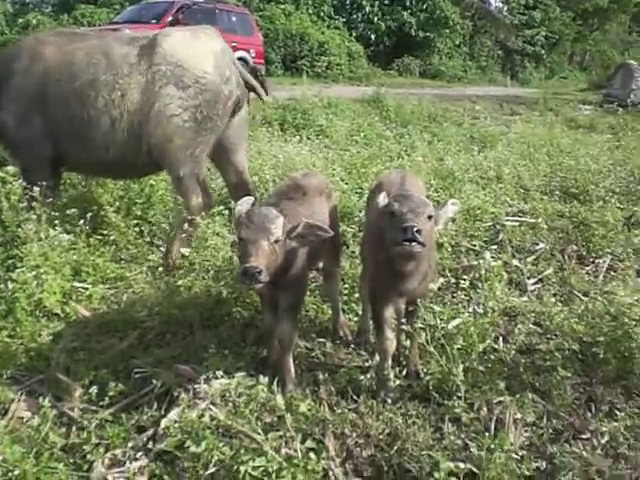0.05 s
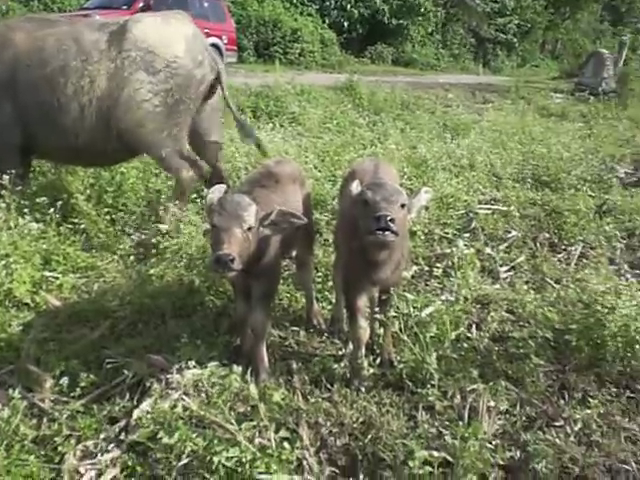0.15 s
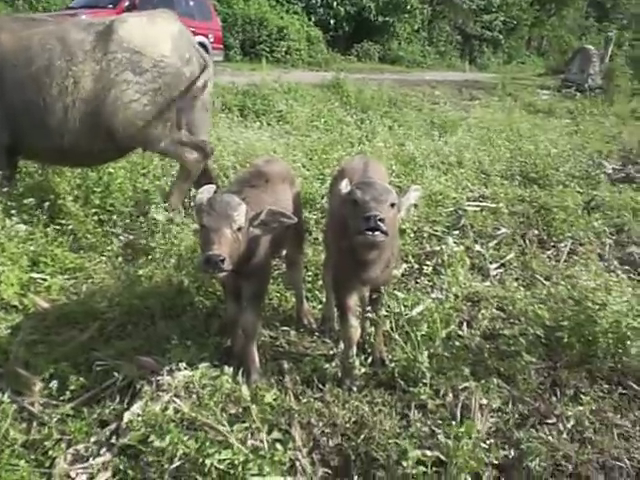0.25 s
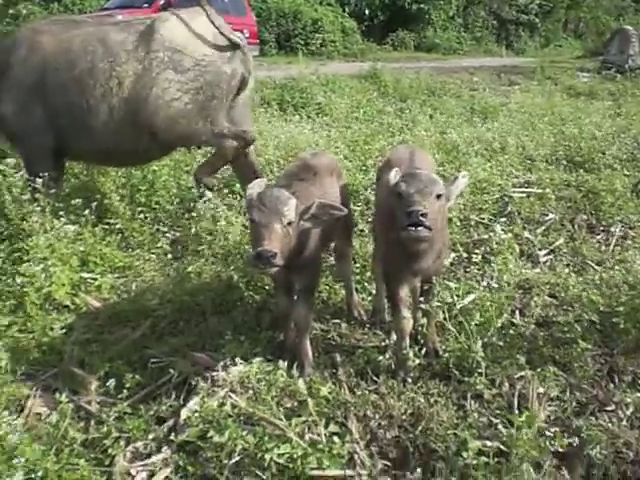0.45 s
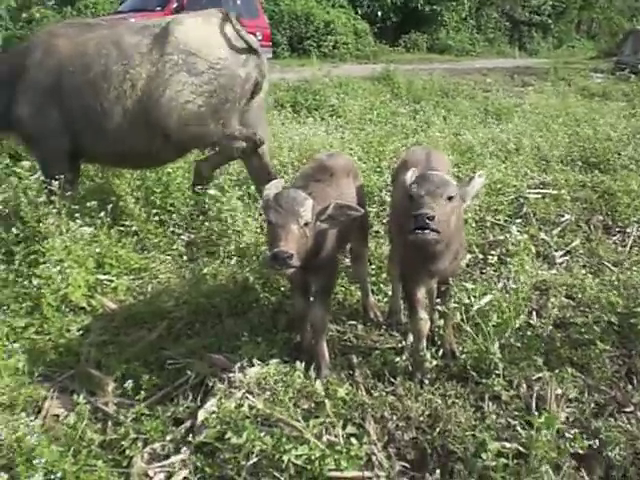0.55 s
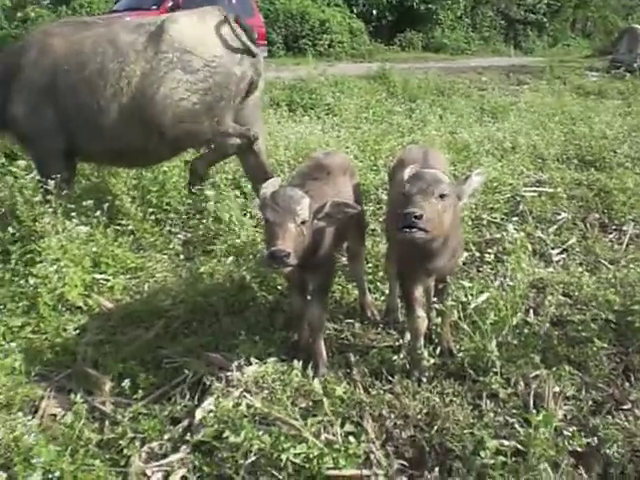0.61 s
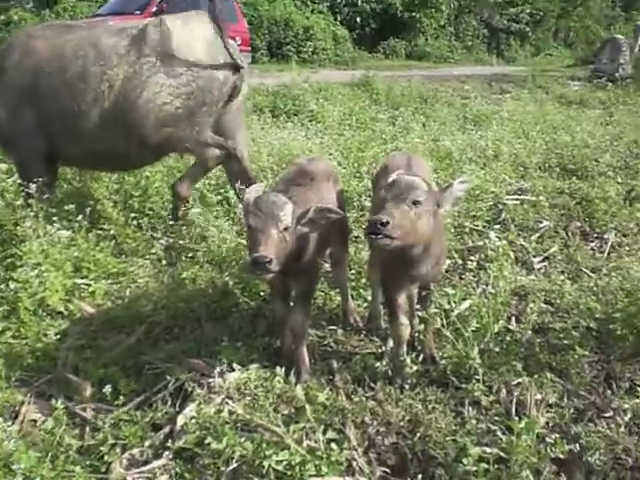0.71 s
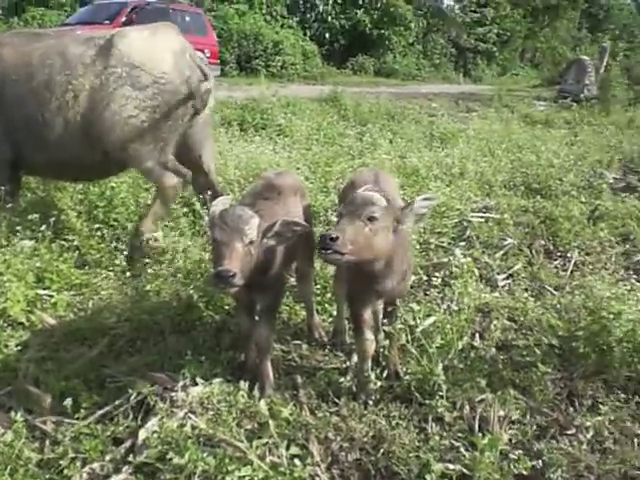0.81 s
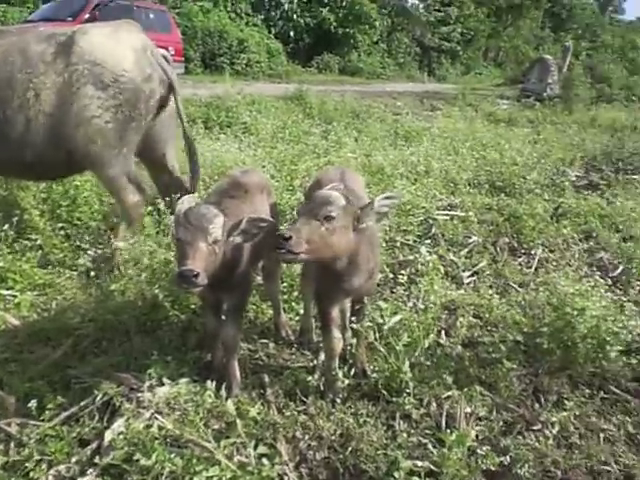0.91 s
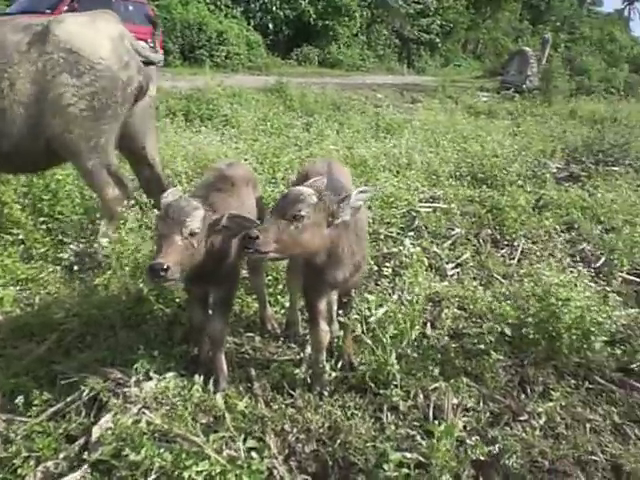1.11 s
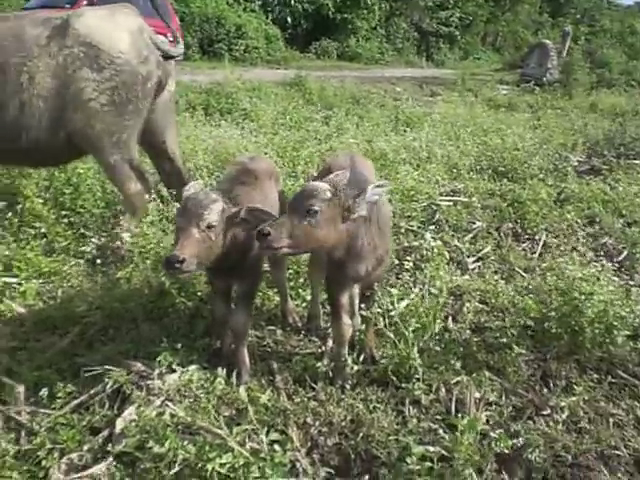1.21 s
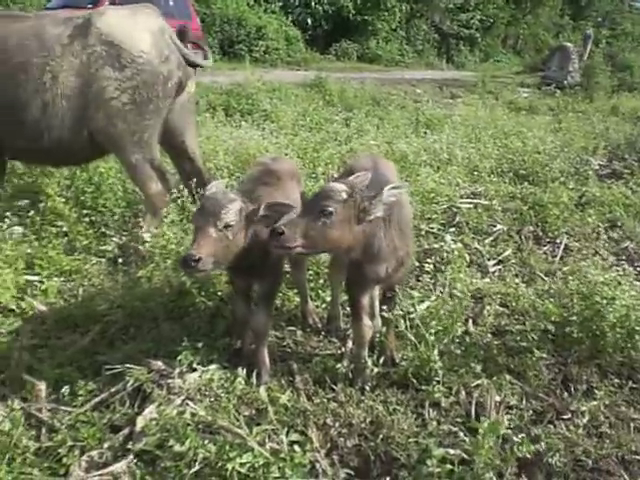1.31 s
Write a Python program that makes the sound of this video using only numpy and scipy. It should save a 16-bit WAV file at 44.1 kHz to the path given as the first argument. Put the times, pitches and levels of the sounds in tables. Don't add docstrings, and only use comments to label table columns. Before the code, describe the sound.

Cattle brushing through dry grass, twigs snapping, over chirping insects and low wind bumps

```python
import sys
import numpy as np
from scipy import signal
from scipy.fft import rfft, irfft
from scipy.io import wavfile
from scipy.ndimage import uniform_filter1d

SR = 44100
rng = np.random.default_rng(int(sys.argv[2]) if len(sys.argv) > 2 else 0)


def generate_wav(sig):
    pcm = np.round(np.clip(np.atleast_2d(sig).T, -1, 1) * 32767).astype(np.int16)
    wavfile.write(sys.argv[1], SR, pcm)


def ratio_of_db(decibels):
    return 10 ** (np.asarray(decibels, float) / 20)


N = 59535

# (frequency [Hz], density [dB])
AIR_SPECTRUM = [(250, 2.5), (500, 2.5), (1000, 4), (2000, -2), (3500, -4.5), (7000, -3.5), (10000, -4),
                (17000, -8.5)]
# (centre [Hz], width [Hz], level [dB], throb rate [1/s], throb depth [dB])
CHORUSES = [
    (5740, 910, -53, 170, 2.5),
    (5510, 980, -58.5, 130, 2.3),
    (9920, 870, -58.5, 120, -0.3),
]
# (time [s], gain [dB])
CHORUS_SWELL = [
    (0, 0),
    (.35, 0),
    (.43, -6),
    (.5, 1),
    (.62, -1.7),
    (.85, 2.3),
    (.98, 2.5),
    (1.18, 0.9),
    (1.35, -1.5),
]
# (time [s], level [dB])
BIRD_NOTES = [(.598, -57), (.629, -46.5), (.663, -45.5), (.805, -50), (.838, -49), (0.871, -47),
              (1.012, -49.5), (1.043, -45.5), (1.076, -49), (1.249, -49), (1.280, -44.5), (1.31, -43.5)]
# (time [s], first pulse [dB], second pulse [dB])
CRICKET_PAIRS = [
    (.003, -41, -50),
    (.552, -44, -46),
    (0.63, -42, -44.5),
    (.704, -42, -39),
    (0.78, -41, -46),
    (0.854, -42, -43),
    (0.929, -49, -41.5),
    (1.008, -41.5, -45.5),
    (1.087, -43, -46),
]
# (time [s], swish level [dB], band centre [Hz])
WADING = [(0, -70.5, 700), (.1, -55.5, 910), (.25, -64, 2800), (.36, -55, 1580), (.45, -58, 3100),
          (.53, -54, 1940), (.62, -49, 1720), (.72, -53.5, 1280), (.82, -60.5, 1070), (.95, -63, 2560),
          (1.05, -65.5, 1020), (1.18, -57.5, 990), (1.27, -67.5, 3300), (1.32, -49, 4040),
          (1.35, -58, 3800)]
# (time [s], rumble level [dB])
GUST_RUMBLE = [(0, -42), (.03, -51.5), (.38, -52), (.47, -48), (.55, -49), (.62, -52.5), (.70, -38.5),
               (.74, -40), (.79, -48.5), (.89, -47), (.95, -43), (1.02, -47), (1.08, -44.5), (1.14, -52.5),
               (1.23, -46), (1.35, -53)]
# (frequency [Hz], density [dB])
RUMBLE_SPECTRUM = [(25, -27), (45, -2), (75, 0.5), (130, -2), (220, -6.5), (320, -13), (500, -31),
                   (900, -45)]
# (time [s], peak [dB], size as pitch [Hz], push +1 or pull -1)
WIND_EDDIES = [(0.456, -30, 115, -1), (0.476, -27, 79, -1), (0.6789, -23.5, 188, -1),
               (0.7226, -15.5, 272, -1), (0.7317, -16.5, 186, 1), (0.7357, -27.5, 292, 1),
               (0.7456, -25.5, 204, -1), (.676, -28, 257, 1), (0.7276, -28, 158, -1),
               (0.927, -18.5, 113, -1), (0.9433, -25, 240, 1), (0.946, -21, 126, -1), (.9775, -34, 130, -1),
               (1.074, -30, 124, 1), (0.536, -36, 59.7, 1), (.933, -30, 87.5, 1)]
# (time [s], rustle level [dB], tilt [dB/octave])
STALK_BRUSHES = [(0, -62.5, -6), (.055, -49, 3.5), (.066, -44.5, -0.1), (.165, -43.5, 0.7),
                 (.195, -40, 1.4), (.255, -41, -0.6), (.32, -42.5, 1.2), (.44, -48.5, -1.3),
                 (.55, -45.5, -1.7), (.68, -54, -1), (.77, -46, 0.9), (.905, -48.5, 0.3), (.918, -37, 2),
                 (.95, -40, -1), (.985, -49, -3), (1.02, -53, -0.3), (1.35, -56, -3.05)]
# (frequency [Hz], density [dB])
STALK_SPECTRUM = [(500, -5), (1200, -7), (3000, -2), (5000, 0), (8000, -3), (12000, 0.5), (17000, -2)]
# (time [s], peak [dB], lowest [Hz], highest [Hz])
TWIG_SNAPS = [(0.0624, -33, 7300, 17000), (0.206, -28, 9000, 17000), (.250, -31, 1500, 7040),
              (0.3867, -28, 950, 7040), (0.574, -21.5, 960, 6900), (0.9184, -20, 7500, 18300),
              (.919, -34, 1520, 7000), (.946, -34, 3000, 7050), (1.163, -35, 7300, 13500),
              (1.222, -28.5, 1010, 7260), (1.236, -37, 6040, 11700), (1.2645, -32, 6500, 17000),
              (1.338, -40, 13500, 17000)]
# (frequency [Hz], level [dB])
CAMERA_WHINE = [
    (13184, -67),
    (14508, -63),
]


def unit(x):
    return x / np.sqrt(np.mean(x ** 2))


def read(table, col):
    points = np.array(table)
    return np.interp(np.arange(N) / SR, points[:, 0], points[:, col])


def walk(rate_hz):
    hold = int(SR / rate_hz)
    levels = rng.standard_normal(400)[:N // hold + 1]
    return unit(uniform_filter1d(np.repeat(levels, hold)[:N], hold))


def band(x, centre_hz, width_hz):
    f = np.fft.rfftfreq(len(x), 1 / SR)
    bell = np.exp(-((f - centre_hz) / width_hz) ** 2 * 2)
    return irfft(rfft(x) * bell, len(x))


def half_octave(f, octave, ref_hz):
    return np.clip(1 - 2 * np.abs(np.log2(f / ref_hz) - octave), 0, 1)


def hiss(spectrum, source, flicker_db, rate_hz, tilt_db):
    f = np.fft.rfftfreq(N, 1 / SR) + 1
    points_hz, points_db = np.array(spectrum).T
    spec = rfft(source) * ratio_of_db(np.interp(np.log(f), np.log(points_hz), points_db))
    out = 0
    for octave in np.arange(-9, 1.5, 0.5):
        part = irfft(spec * half_octave(f, octave, 10000), N)
        out = out + part * ratio_of_db(flicker_db * walk(rate_hz) + tilt_db * octave)
    return out / np.sqrt(np.mean(irfft(spec, N) ** 2))


def add(out, time_s, x):
    i = int(time_s * SR)
    out[i:i + len(x)] += x[:N - i]


def glide(length_s, from_hz, to_hz, level_db):
    n = int(length_s * SR)
    u = np.arange(n) / n
    pitch_hz = from_hz * (to_hz / from_hz) ** u ** 0.877
    swell = np.sin(np.pi * u) ** 0.55
    return np.sqrt(2) * ratio_of_db(level_db) * swell * np.sin(2 * np.pi * np.cumsum(pitch_hz) / SR)


def distant_air():
    return ratio_of_db(-53) * hiss(AIR_SPECTRUM, rng.standard_normal(N), 1.44, 8.34, 0)


def insect_chorus():
    out = np.zeros(N)
    for centre_hz, width_hz, level_db, rate_hz, throb_db in CHORUSES:
        blur = unit(band(rng.standard_normal(N), centre_hz, width_hz))
        out += blur * ratio_of_db(level_db + throb_db * walk(rate_hz) + read(CHORUS_SWELL, 1))
    return out


def bird():
    out = np.zeros(N)
    for time_s, level_db in BIRD_NOTES:
        add(out, time_s, glide(0.0201, 5350, 4263, level_db))
    return out


def cricket():
    pair_gap_s, pulse_s, from_hz, to_hz = 0.0125, 0.0084, 6000, 5640
    out = np.zeros(N)
    for time_s, first_db, second_db in CRICKET_PAIRS:
        add(out, time_s, glide(pulse_s, from_hz, to_hz, first_db))
        add(out, time_s + pair_gap_s, glide(pulse_s, from_hz, to_hz, second_db))
    return out


def leaf_scatter(x):
    t60_s, tail_db = 0.15, -14
    t = np.arange(4000) / SR
    tail = rng.standard_normal(len(t)) * 1000 ** (-t / t60_s)
    tail /= np.sqrt(np.sum(tail ** 2))
    return x + ratio_of_db(tail_db) * signal.fftconvolve(x, tail)[:N]


def wading():
    width_octaves = 1.28
    f = np.fft.rfftfreq(N, 1 / SR) + 1
    grains = rng.standard_normal(N) * ratio_of_db(2.43 * walk(150))
    spec = rfft(grains) / np.sqrt(f)
    centre_octave = np.log2(read(WADING, 2))
    out = 0
    for octave in np.arange(9, 13, 0.5):
        part = irfft(spec * half_octave(f, octave, 1), N)
        near_centre = np.exp(-((octave - centre_octave) / width_octaves) ** 2)
        out = out + part * near_centre * ratio_of_db(0.98 * walk(28.7))
    return ratio_of_db(read(WADING, 1)) * unit(out)


def wind():
    t = np.arange(N) / SR
    out = ratio_of_db(read(GUST_RUMBLE, 1)) * hiss(RUMBLE_SPECTRUM, rng.standard_normal(N), 2.16, 30, 0)
    for time_s, peak_db, size_hz, sign in WIND_EDDIES:
        a = (np.pi * size_hz * (t - time_s)) ** 2
        out = out + np.sign(sign) * ratio_of_db(peak_db) * (1 - 1.24 * a) * np.exp(-a)
    bass_cut = signal.butter(2, 34, "high", fs=SR, output="sos")
    return signal.sosfiltfilt(bass_cut, out)


def stalks():
    clicks = rng.standard_normal(N) * ratio_of_db(2.6 * rng.exponential(size=N))
    grains = unit(clicks * ratio_of_db(1.43 * walk(150)))
    rustle = hiss(STALK_SPECTRUM, grains, 0.95, 41.03, read(STALK_BRUSHES, 2))
    return ratio_of_db(read(STALK_BRUSHES, 1)) * rustle


def snaps():
    t60_s, tail_db, tilt, lead = 0.02, -15.5, 0.36, 64
    t = np.arange(1024) / SR
    f = np.fft.rfftfreq(2048, 1 / SR) + 1
    out = np.zeros(N)
    for time_s, peak_db, low_hz, high_hz in TWIG_SNAPS:
        splinters = ratio_of_db(tail_db) * rng.standard_normal(1024) * 1000 ** (-t / t60_s)
        crack = np.r_[np.zeros(lead), 1, splinters]
        snap_band = f ** -tilt / (1 + (low_hz / f) ** 10) / (1 + (f / high_hz) ** 30)
        x = irfft(rfft(crack, 2048) * snap_band)[:1024]
        add(out, time_s - lead / SR, ratio_of_db(peak_db) * x / np.abs(x).max())
    return out


def scene():
    mix = distant_air() + wind() + stalks() + wading()
    mix += leaf_scatter(insect_chorus() + bird() + cricket())
    return (mix + snaps())[None]


def low_pass(x):
    return signal.sosfilt(signal.butter(12, 17960, fs=SR, output="sos"), x)


def record(dry):
    t = np.arange(N) / SR
    x = signal.lfilter(*signal.iirnotch(7200, 59, fs=SR), dry)
    for whine_hz, level_db in CAMERA_WHINE:
        x = x + np.sqrt(2) * ratio_of_db(level_db) * np.sin(2 * np.pi * whine_hz * t)
    top_cut = signal.ellip(12, 0.3, 70, 17350, fs=SR, output="sos")
    return low_pass(signal.sosfilt(top_cut, x))


dry = scene()
out = record(dry)
generate_wav(out)
```